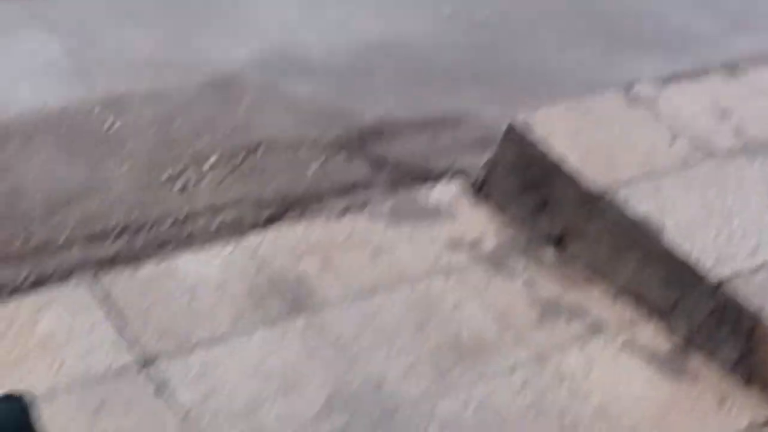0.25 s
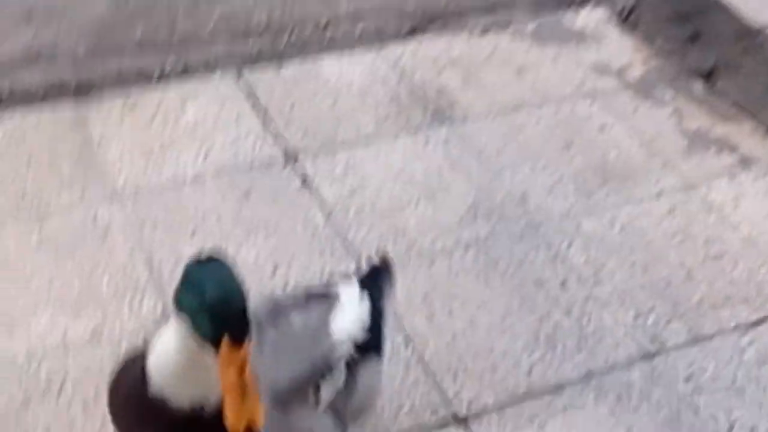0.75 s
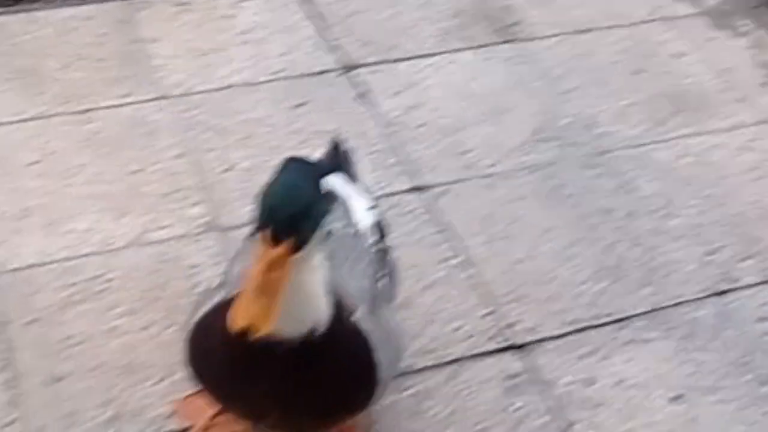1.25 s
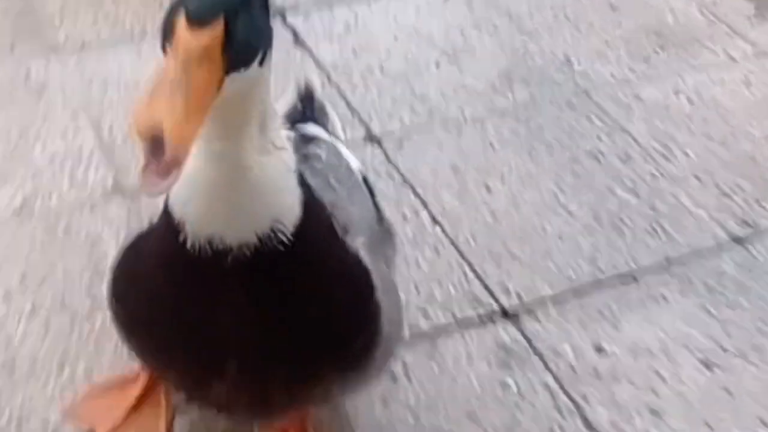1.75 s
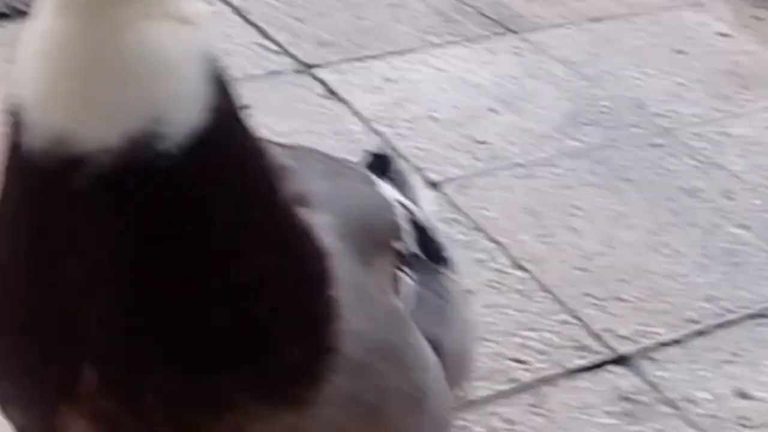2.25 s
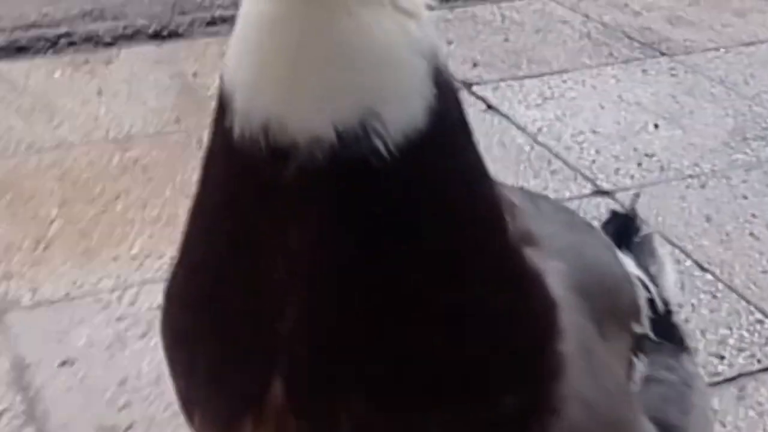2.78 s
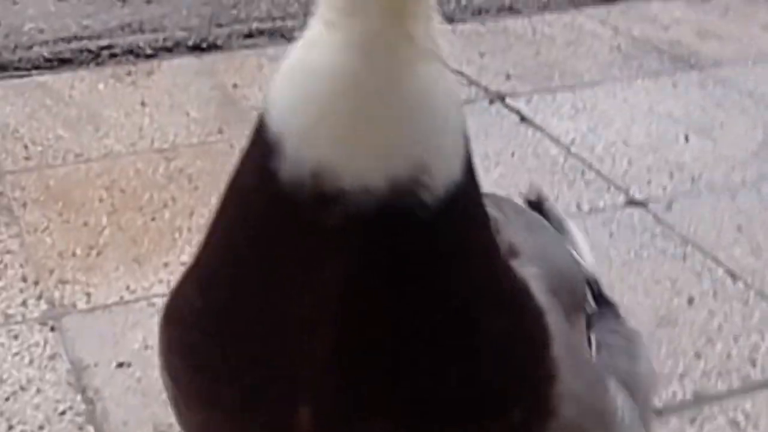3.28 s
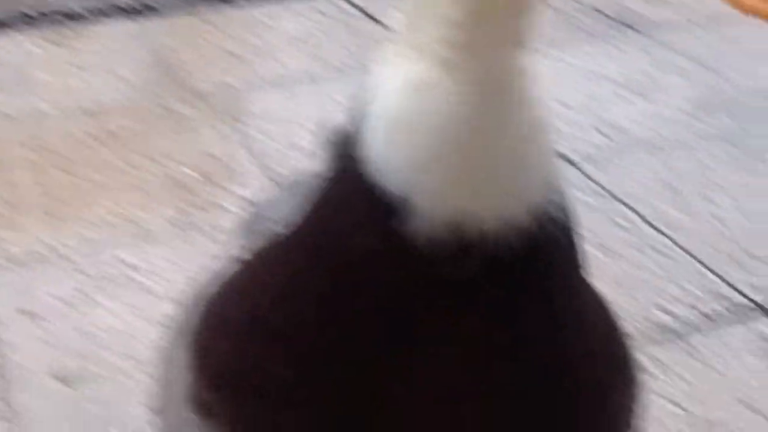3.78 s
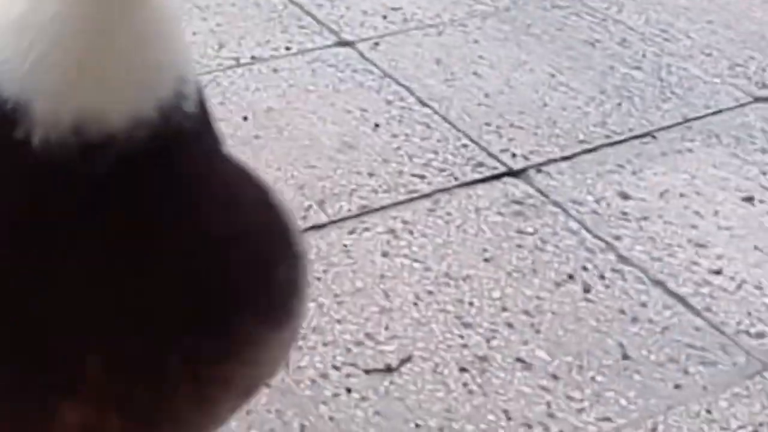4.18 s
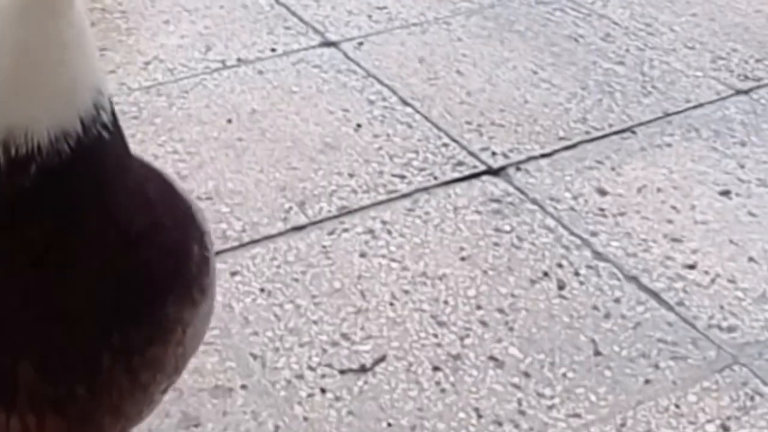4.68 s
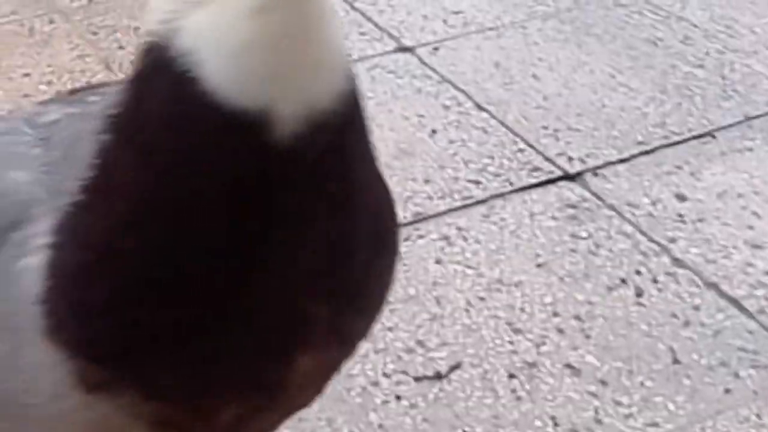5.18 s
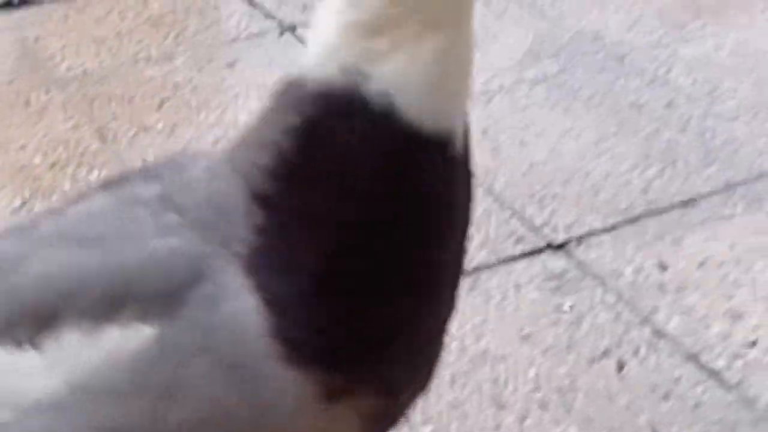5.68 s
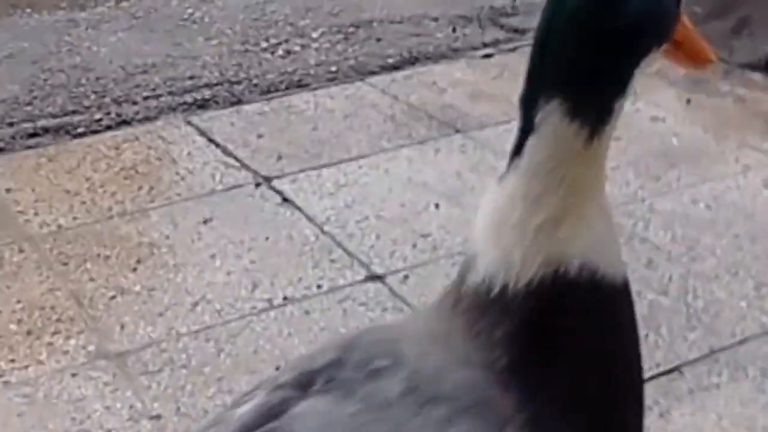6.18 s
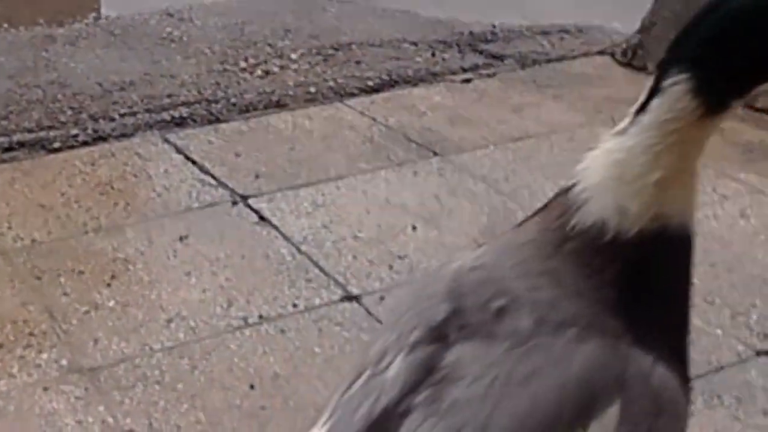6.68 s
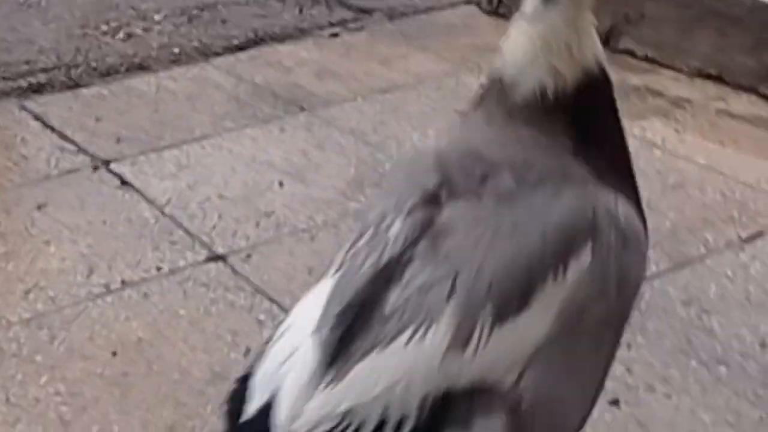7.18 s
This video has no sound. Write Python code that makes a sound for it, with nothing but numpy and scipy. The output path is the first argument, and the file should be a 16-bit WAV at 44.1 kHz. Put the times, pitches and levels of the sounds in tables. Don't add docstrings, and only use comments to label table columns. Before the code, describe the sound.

A single duck gives a nearly continuous series of short, grating quacks close to a handheld mono microphone, swelling to their loudest around two to three seconds. Low wind rumble and buffets, breathy hiss and small wet foot ticks surround them, with a dull short echo from nearby walls. Finally the calls slow, lose their bright edge and fade over a distant street hum.

```python
import sys
import numpy as np
from scipy import signal
from scipy.io import wavfile

SR = 44100
rng = np.random.default_rng(int(sys.argv[2]) if len(sys.argv) > 2 else 0)


def digitize_waveform(pressure):
    field = np.atleast_2d(pressure).T
    bounded = np.clip(field, -1, 1)
    quanta = np.round(bounded * 32767).astype(np.int16)
    wavfile.write(sys.argv[1], SR, quanta)


def volts_from_decibels(level):
    exponent = np.asarray(level, float) / 20
    return 10 ** exponent


N = 328306

# (time [s], length to the release [s], level [dB], puff rate [Hz], release [s])
BURST_QUACKS = [(.267, 0.047, -40, 70, 0.1015), (.934, 0.0687, -41, 80, 0.061),
                (1.435, 0.0741, -36, 73.6, 0.0565), (1.859, 0.0427, -29.5, 73.3, 0.1176),
                (2.252, 0.0554, -26, 80.9, 0.119), (2.647, .19, -27, 90.5, 0.065),
                (3.105, 0.1602, -31, 78.6, 0.057), (3.548, 0.0591, -29, 80.7, 0.0606),
                (3.999, 0.1087, -30.5, 69.6, 0.091), (4.365, 0.0565, -29, 75.3, 0.0457),
                (4.822, .145, -30.5, 79.5, .045), (5.197, 0.0546, -31, 78.2, 0.0586)]
# (time [s], length to the release [s], level [dB], puff rate [Hz], release [s])
SWELL_QUACKS = [(-.04, 0.0785, -44, 80, 0.085), (.354, 0.066, -42, 73, .08),
                (.527, 0.0552, -35.5, 71.5, 0.0625), (1.102, 0.0465, -35, 87, 0.0582),
                (1.582, 0.0663, -28.5, 94.5, 0.0515), (1.972, 0.09224, -24, 84.8, 0.0499),
                (2.365, 0.0876, -23, 107.5, 0.0473), (2.814, 0.07206, -23, 87, 0.0354),
                (3.667, 0.0763, -26.5, 83, 0.0519), (4.514, 0.06374, -27, 66.5, 0.0587),
                (5.305, 0.0862, -32.5, 83.6, 0.0597)]
# (time [s], length to the release [s], level [dB], puff rate [Hz], release [s])
AWAY_QUACKS = [
    (5.738, 0.16, -35.5, 78.7, 0.0602),
    (6.22, 0.1094, -38.5, 65.9, 0.0922),
    (6.723, .125, -45, 67, .07),
    (7.247, 0.1195, -48.5, 64.4, 0.0746),
]
# (time [s], peak [dB])
OPENINGS = [(0.267, -34), (0.935, -31.5), (1.434, -26), (1.858, -20), (2.252, -18), (2.647, -19),
            (3.105, -22), (3.55, -20), (3.999, -19), (4.364, -18), (4.821, -21.5), (5.198, -25),
            (5.732, -36.5), (6.221, -32.5), (6.719, -46), (7.247, -46)]
# (time [s], brightness [dB], bill resonance [Hz], middle [dB], top against 5300 Hz [dB])
HEAD = [(0, -11, 1799, -10.5, -1.5), (.3, -7.5, 1559, -14, -14.5), (.42, -18, 1688, -18.5, -18),
        (.58, -7.5, 1701, -18.5, -10), (.97, -9.5, 1753, -14.5, 5), (1.14, -9.5, 1774, -8, -7),
        (1.6, -10, 1757, -12, -4), (1.95, -9.5, 1723, -12, -14), (2.4, -14, 1767, -9.5, -16),
        (2.8, -18, 1788, -10.5, -1.5), (3.2, -20, 1550, -15.5, -6), (3.65, -17.5, 1695, -13, -8.5),
        (4.05, -15.5, 1811, -15, -11.5), (4.5, -15, 1633, -15, -21.5), (5.3, -17.5, 1614, -17, -13.5),
        (5.8, -21, 1643, -13.5, -22.5), (6.3, -23.5, 1638, -22, -12), (7.3, -30.5, 1585, -24, -8.5)]
# (level at the mean [dB], slope [dB per dB])
LOUDNESS_COLOUR = [(-3, -0.0281), (-4, -0.4519), (-2.5, -.9), (-2, -.1)]
# (frequency [Hz], width [Hz], level [dB])
PIPE_LOW = [(977.4, 100, -18.5), (2013.8, 191.4, -0.5)]
PIPE_MIDDLE = [(2537, 190, 3), (3013, 170, -7)]
PIPE_HIGH = [(3318, 200, 0.5), (3851, 280, 0), (4426.5, 250, 1), (5130, 290, 0), (5544, 230, 2),
             (5888, 180, 2), (6495, 190, -1), (7082, 260, -1), (7590, 160, -2), (8660, 400, -14.5),
             (11900, 780, -23)]
# (time [s], level [dB], sharpness [dB])
HISS = [(0, -58, -4), (.15, -70, -7), (.5, -77, -10), (.75, -63, -0.5), (1.07, -62.5, 3.5), (1.22, -76, -2),
        (1.565, -56, -3), (1.83, -66.5, -5.5), (2.23, -60.5, -6.5), (2.55, -67.5, -4.5), (3.0, -85, -8.5),
        (4.22, -85, -7.5), (4.34, -65.5, 2.5), (4.66, -74.5, -4.5), (4.79, -69, -0.5), (5.17, -67.5, -8.5),
        (5.32, -85, -8), (7.44, -89.5, -8)]
# (frequency [Hz], density [dB per Hz])
HISS_COLOUR = [(1470, -52), (2500, -2.5), (3480, -9), (4220, 2.5), (4810, -22.5), (6660, 17.5),
               (7490, -3.5), (9870, -47.5), (13000, -24)]
# (time [s], level [dB])
WIND = [(.1, -43), (1.15, -42.5), (1.4, -37), (1.8, -27), (2.0, -35.5), (2.3, -50.5), (2.64, -48.5),
        (2.9, -38), (3.3, -42.5), (3.66, -32.5), (3.82, -60), (3.96, -42), (4.2, -43.5), (4.34, -57),
        (4.7, -44), (5.2, -49.5), (5.6, -40.5), (6.06, -53.5)]
# (frequency [Hz], density [dB per Hz])
WIND_LOW = [(13, -57.5), (22, -34), (67, 5), (103, 6), (151, 4.5), (300, -16.5), (390, -46.5), (660, -120)]
# (time [s], level [dB], length [s])
GUSTS = [(0.287, -34.5, 0.024), (.47, -31.5, 0.051), (0.653, -37, 0.036), (0.748, -41, 0.0124),
         (0.897, -39.5, 0.029), (1.233, -30, 0.0218), (2.849, -31, 0.0374), (2.926, -31, 0.0149),
         (3.051, -34, 0.0359), (3.575, -38, 0.0563), (6.23, -47.5, 0.055), (6.522, -45.5, 0.133),
         (6.932, -44, 0.206), (7.44, -49, 0.062)]
# (time [s], peak [dB], length [s])
THUMPS = [(0.276, -24, 0.00325), (0.468, -21, 0.00263), (0.737, -27.5, 0.00407), (1.231, -19.5, 0.0038),
          (1.748, -25.5, 0.00157), (1.82, -22.5, 0.00135), (1.877, -21.5, 0.00094), (1.958, -23, 0.00114),
          (2.689, -33.5, 0.00138), (2.847, -18, 0.00247), (2.927, -18.5, 0.00198), (3.049, -20, 0.00145),
          (3.564, -24.5, 0.00197), (5.507, -41.5, 0.0026), (5.652, -37.5, 0.00176), (6.456, -33.5, 0.00394),
          (6.571, -33, 0.00362), (6.891, -29.5, 0.00261), (6.964, -39, 0.00131), (7.026, -35, 0.00214)]
# (frequency [Hz], density [dB per Hz])
STREET = [(180, -30), (300, -7.5), (654, -10), (896, 0.5), (1580, -4.5), (2820, -23), (4710, -27),
          (5940, -44.5), (9930, -45.5), (15800, -55)]
# (time [s], level [dB])
STREET_LEVEL = [(0.0, -52.5), (0.74, -58), (2.86, -49.5), (3.25, -57), (7.27, -62.5), (7.44, -60.5)]
# (time [s], peak [dB], length [s])
STEPS = [(0.532, -48.5, 0.032), (0.935, -39, 0.0223), (1.299, -33.5, 0.0235), (1.361, -42.5, 0.0283),
         (1.476, -35.5, 0.066), (2.115, -32.5, 0.0086), (2.9922, -52.5, 0.0096), (4.081, -49.5, 0.02),
         (5.053, -50.5, 0.016), (5.1342, -50.5, 0.012), (5.488, -65.5, 0.029), (5.5378, -70.5, 0.02),
         (5.683, -67.5, 0.013), (5.827, -45, 0.0155), (5.9412, -54.5, 0.017), (6.012, -60, 0.019),
         (6.097, -52, 0.0249), (6.464, -60, 0.0254), (7.401, -47, 0.0181)]
# (frequency [Hz], density [dB per Hz])
STEP_COLOUR = [(1180, -56), (2000, -18), (2780, -5), (4710, -4.5), (7320, 5.5), (15800, -46)]
# (time [s], length [s], frequency [Hz], width [Hz], level [dB])
TWITTER = [
    (.74, .02, 2900, 450, -68),
    (.835, .012, 4300, 250, -62),
    (.87, .04, 2900, 450, -70),
    (6.12, .09, 4200, 450, -80),
    (6.1, .07, 4800, 400, -83),
]

# (start under the level [dB], attack [s], climb over the hold [dB],
# glare at the start [dB], glare decay [s] (negative: it grows), dulling [dB per s])
BURST = (15.9, 0.0277, 0.23, 8.9, 0.01, 36)
SWELL = (19.5, 0.0607, -1, -5.5, 0.0022, 5.5)
MUTTER = (17, 0.0444, -5.83, -11.5, -0.08, 30)
# (bill [dB], middle [dB], 3000 Hz [dB], 3400, 4100, 6400, 7500 Hz against 5300 Hz [dB])
FACING = (0.1, 0.1, 0.1, 0.1, 0.1, 0.1, 0.1)
WIDE = (4.1, 3, 0.1, 0.1, 0.1, 0.1, 0.1)
BACK = (5, 0.02, 6, 0, -4, -11, -3)

THROAT_HZ, THROAT_WIDTH_HZ, BILL_WIDTH_HZ = 1363, 225, 225.5
MEAN_QUACK_DB, SLOT_S, FIRST_PUFF_S = -33, .3, .007
RELEASE_DB, RELEASE_BEND, ATTACK_BEND = 35.5, 1.527, 1.734
SHOULDER_DB, SHOULDER_SHARE = 2, 0.19
BRIGHT_FOLLOWS, MIDDLE_FOLLOWS = 0.1, 0.56
LOW_FOLLOWS_PER_OCTAVE, TOP_FOLLOWS_PER_KHZ = .55, 0.079
SNAP_TOP_HZ, SNAP_BACK_HZ, TURNS_AWAY_S = 15000, 3500, 5.6
ECHO_T60_S, ECHO_DB = 0.17, -23
HISS_TOP_UNDER_DB, HISS_TOP_FLOOR_DB = 28.5, -104
WIND_BRIGHT_DB, WIND_BRIGHT_FOLLOWS = -15.5, -.45
GUST_BRIGHT_DB, GUST_REACH, GUST_REFERENCE_DB = -14, 0.98, -33


def rms_one(x):
    return x / np.sqrt(np.mean(x ** 2) + 1e-20)


def in_time(rows, t):
    s, *columns = np.transpose(rows)
    return [np.interp(t, s, column) for column in columns]


def add(out, s, sound):
    i = round(s * SR)
    out[max(i, 0):i + len(sound)] += sound[max(-i, 0):N - i]


def drift(rate_hz):
    every = 40
    r = np.exp(-2 * np.pi * rate_hz * every / SR)
    slow = signal.lfilter([1], [1, -2 * r, r * r], rng.standard_normal(N // every + 2002))[2000:]
    return np.interp(np.arange(N) / every, np.arange(len(slow)), rms_one(slow))


def band(x, low_hz, high_hz, order=2):
    return signal.sosfilt(signal.butter(order, [low_hz, high_hz], "band", fs=SR, output="sos"), x)


def resonate(x, hz, width_hz):
    r = np.exp(-np.pi * width_hz / SR)
    zeros = np.array([1, 0, -1]) * (1 - r * r) / 2
    return signal.lfilter(zeros, [1, -2 * r * np.cos(2 * np.pi * hz / SR), r * r], x)


def spindles(air, hz, width_hz):
    return rms_one(resonate(resonate(air, hz, width_hz), hz, width_hz)) * np.sqrt(width_hz)


def coloured(spectrum, patchy_db, per_s):
    hz, level_db = np.transpose(spectrum)
    edges = np.geomspace(hz[0], hz[-1], int(3 * np.log2(hz[-1] / hz[0])) + 2)
    together = drift(per_s)
    white = rng.standard_normal((2, N))
    out = 0
    for k, (low, high) in enumerate(zip(edges, edges[1:])):
        centre_db = np.interp(np.log(low * high) / 2, np.log(hz), level_db)
        flicker_db = patchy_db * (together + drift(per_s))
        out = out + volts_from_decibels(centre_db + flicker_db) * band(white[k % 2], low, high)
    return rms_one(out)


def effort(row, shape):
    s, length, level_db, puffs_hz, release = row
    under_db, attack, climb_db, glare_db, glare_s, dull_db = shape
    age = np.arange(round(SLOT_S * SR)) / SR
    rise = np.clip(1 - age / attack, 0, 1)
    fall = np.clip((age - length) / release, 0, 1)
    hold_db = climb_db * (np.minimum(age / length, 1) - .5)
    shape_db = hold_db - under_db * rise ** ATTACK_BEND - RELEASE_DB * fall ** RELEASE_BEND
    tilt_db = glare_db * np.exp(-age / glare_s) - dull_db * (age - length / 2)
    return age, level_db + shape_db, tilt_db


def puffs(phase, open_share, leak, clean, uneven_db):
    strength = volts_from_decibels(uneven_db * rng.standard_normal(64))[phase.astype(int) % 64]
    within = phase % 1 / open_share
    pulse = clean * (np.diff(np.floor(phase), prepend=0) > 0)
    noise = rng.standard_normal(len(phase))
    return strength * (pulse + within * np.exp(1 - within) * noise) + leak * noise


def shade_db(hz, shade):
    at_3400, at_4100, at_6400, at_7500 = shade
    corners_hz = [3450, 3800, 4500, 5000, 5600, 6000, 6700, 7200]
    return np.interp(hz, corners_hz, np.repeat([at_3400, at_4100, 0, at_6400, at_7500], 2)[1:-1])


def low_and_middle_pipe(phase, low, middle, sunk_db):
    parts = []
    for modes in (low, middle):
        lates = [min(.5 * np.log2(hz / 1350), .36) for hz, width, db in modes]
        airs = [puffs(phase - late, open_share=.07, leak=.2, clean=12, uneven_db=1.3) for late in lates]
        parts.append([volts_from_decibels(db) * spindles(air, hz, width) for air, (hz, width, db) in zip(airs, modes)])
    octaves_up = [max(np.log2(hz / THROAT_HZ), 0) for hz, width, db in low]
    follow = [volts_from_decibels(LOW_FOLLOWS_PER_OCTAVE * octaves * sunk_db) for octaves in octaves_up]
    low_sound = np.sum(np.multiply(follow, parts[0]), 0) / np.std(sum(parts[0]))
    return low_sound, rms_one(sum(parts[1]))


def high_pipe(phase, shade, sunk_db):
    air = puffs(phase - .3, open_share=0.14, leak=0.63, clean=10.0, uneven_db=3.5)
    turn = rng.standard_normal((len(PIPE_HIGH), 2))
    high = 0
    for (hz, width, db), (louder, higher) in zip(PIPE_HIGH, turn):
        follow_db = TOP_FOLLOWS_PER_KHZ * (hz / 1e3 - 4.5) * sunk_db
        mode_db = db + shade_db(hz, shade) + 1.6 * louder + follow_db
        high = high + volts_from_decibels(mode_db) * spindles(air, hz * (1 + 0.023 * higher), width)
    return rms_one(band(high, 3100, 9500, order=3))


def quack(row, shape, side):
    s, length, loudness_db, puffs_hz, release = row
    t, level_db, tilt_db = effort(row, shape)
    under_peak_db = level_db - level_db.max()
    sunk_db = np.maximum(under_peak_db, -22)

    bright_db, bill_hz, middle_db, top_db = in_time(HEAD, s + length / 2)
    bill_db, throat_db, at_3400, at_4100 = [db + slope * (loudness_db - MEAN_QUACK_DB)
                                            for db, slope in LOUDNESS_COLOUR]
    shoulder_db = SHOULDER_DB + SHOULDER_SHARE * top_db
    posed = np.add(side, [bill_db, middle_db, 0, at_3400, at_4100, shoulder_db, top_db])
    bill_db, middle_db, lift_db, *shade = posed
    bright_db = bright_db + tilt_db + BRIGHT_FOLLOWS * under_peak_db

    wander = np.interp(t, np.linspace(t[0], t[-1], 32), rng.standard_normal(32))
    phase = 4.47 + (t - FIRST_PUFF_S) * puffs_hz + .05 * wander
    low = PIPE_LOW + [(THROAT_HZ, THROAT_WIDTH_HZ, throat_db), (bill_hz, BILL_WIDTH_HZ, bill_db)]
    middle = [(hz, width, db + lift_db * k) for k, (hz, width, db) in enumerate(PIPE_MIDDLE)]

    low_sound, middle_sound = low_and_middle_pipe(phase, low, middle, sunk_db)
    high_sound = high_pipe(phase, shade, sunk_db)
    middle_gain = volts_from_decibels(middle_db + MIDDLE_FOLLOWS * under_peak_db + 0.5)
    fade = np.clip(np.minimum(t, length + release - t) / .002, 0, 1)
    return fade * volts_from_decibels(level_db) * (low_sound + middle_gain * middle_sound + volts_from_decibels(bright_db) * high_sound)


def opening_click(s, peak_db):
    age = np.arange(SR // 20) / SR
    snap = rng.standard_normal(len(age)) * np.exp(-age / 0.0022)
    body = sum(resonate(snap, hz, 300) for hz, width, db in PIPE_MIDDLE + PIPE_HIGH[:9])
    body = band(body, 1500, 10000, order=4)
    body = body + 33.0 * resonate(snap, 968, 160) + 0.77 * resonate(snap, 900, 550)
    body = body + 0.92 * resonate(snap, THROAT_HZ, 200)
    body = band(body, 200, SNAP_TOP_HZ if s < TURNS_AWAY_S else SNAP_BACK_HZ)
    return volts_from_decibels(peak_db - 9.5) * body / np.abs(body).max()


def drake():
    out = np.zeros(N)
    kinds = ((BURST_QUACKS, BURST, FACING), (SWELL_QUACKS, SWELL, WIDE), (AWAY_QUACKS, MUTTER, BACK))
    for rows, shape, side in kinds:
        for row in rows:
            add(out, row[0], quack(row, shape, side))
    for s, peak_db in OPENINGS:
        add(out, s, opening_click(s, peak_db))
    return out


def walls(x):
    age = np.arange(SR // 3) / SR
    decay = volts_from_decibels(-60 * age / ECHO_T60_S) * (age > .006)
    tail = band(rng.standard_normal(len(age)), 500, 2100) * decay
    return signal.fftconvolve(x, volts_from_decibels(ECHO_DB) * tail / np.linalg.norm(tail))[:N]


def hiss(t):
    level_db, sharp_db = in_time(HISS, t)
    air = coloured(HISS_COLOUR, patchy_db=1.7, per_s=12)
    edge = rms_one(band(rng.standard_normal(N), 6900, 8700, order=3)) * volts_from_decibels(2.2 * drift(14))
    top = rms_one(band(rng.standard_normal(N), 14600, 15900)) * volts_from_decibels(2.5 * drift(15))
    top_db = np.maximum(level_db + sharp_db - HISS_TOP_UNDER_DB, HISS_TOP_FLOOR_DB)
    return volts_from_decibels(level_db) * (air + volts_from_decibels(sharp_db - 8.0) * edge) + volts_from_decibels(top_db + 6.0) * top


def buffet(peak_db, length):
    age = np.arange(SR // 10) / SR - .015
    window = np.exp(-(age / max(length, .0005)) ** 2)
    knock = window * np.sin(2 * np.pi * (190 * age + rng.random()))
    return volts_from_decibels(peak_db + 1.0) * knock / np.abs(knock).max()


def wind(t):
    gusts = sum(volts_from_decibels(db) * np.exp(-((t - s) / length) ** 2) for s, db, length in GUSTS)
    level_db, = in_time(WIND, t)
    bright_db = WIND_BRIGHT_DB + WIND_BRIGHT_FOLLOWS * (level_db + 44)
    lumps = volts_from_decibels(2.8 * drift(16))
    low = coloured(WIND_LOW, patchy_db=1.0, per_s=15.0) * lumps
    red = signal.lfilter([1], [1, -.99], rng.standard_normal(N))
    high = band(red, 220, 550) * lumps ** 1.6
    gust_reach = (gusts / volts_from_decibels(GUST_REFERENCE_DB)) ** GUST_REACH
    high_level = volts_from_decibels(level_db + bright_db) + volts_from_decibels(GUST_BRIGHT_DB) * gusts * gust_reach
    out = (volts_from_decibels(level_db) + gusts) * rms_one(low) + high_level * rms_one(high)
    for s, peak_db, length in THUMPS:
        add(out, s - .008, buffet(peak_db, length))
    return signal.sosfilt(signal.butter(2, 60, "high", fs=SR, output="sos"), out)


def street(t):
    level_db, = in_time(STREET_LEVEL, t)
    return volts_from_decibels(level_db - 7.5) * coloured(STREET, patchy_db=.6, per_s=8)


def feet():
    shape, age = np.zeros(N), np.arange(SR // 8) / SR
    for s, peak_db, length in STEPS:
        rise = 1 - np.exp(-age / 0.0016)
        fall = np.exp(-(age / max(length, .002)) ** 2)
        add(shape, s, volts_from_decibels(peak_db - 12.5) * rise * fall)
    top = rms_one(band(rng.standard_normal(N), 15300, 17000))
    return shape * (coloured(STEP_COLOUR, patchy_db=3.5, per_s=52) + volts_from_decibels(-6) * top)


def far_bird():
    out, age = np.zeros(N), np.arange(SR // 2) / SR - .25
    for s, length, hz, width, db in TWITTER:
        peep = rms_one(spindles(rng.standard_normal(len(age)), hz, width))
        add(out, s - .25, volts_from_decibels(db) * np.exp(-(age / length) ** 4) * peep)
    return out


def scene():
    t = np.arange(N) / SR
    bird = drake()
    return (bird + walls(bird) + hiss(t) + wind(t) + street(t) + feet() + far_bird())[None]


def roll_off(x):
    return signal.sosfilt(signal.butter(12, 16500, fs=SR, output="sos"), x)


def record(dry):
    rounded = .5 * np.tanh(dry / .5)
    mix = signal.sosfilt(signal.cheby2(12, 60, 16000, fs=SR, output="sos"), rounded)
    return roll_off(mix)


dry = scene()
out = record(dry)
digitize_waveform(out)
```